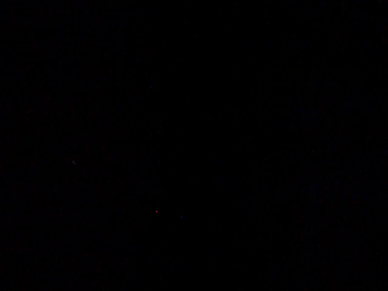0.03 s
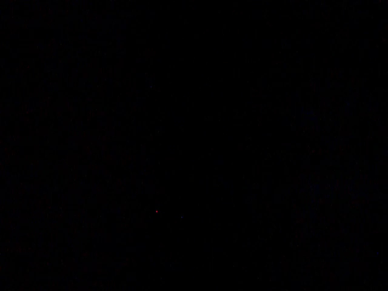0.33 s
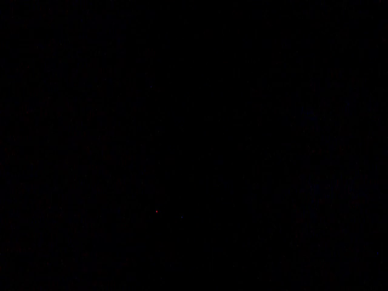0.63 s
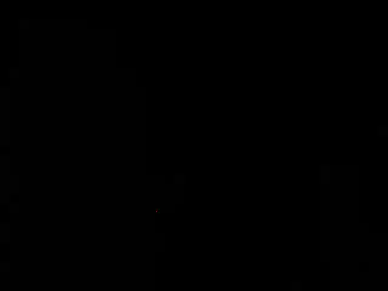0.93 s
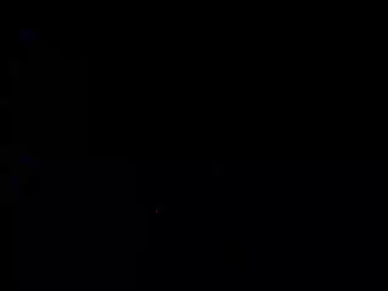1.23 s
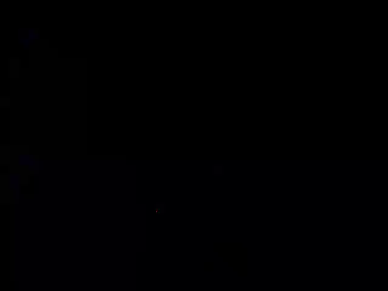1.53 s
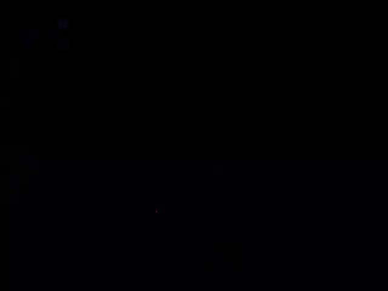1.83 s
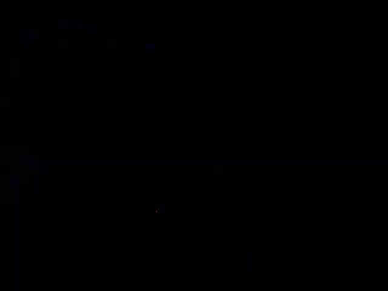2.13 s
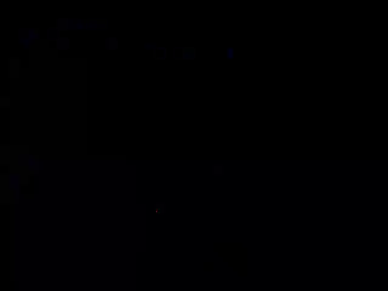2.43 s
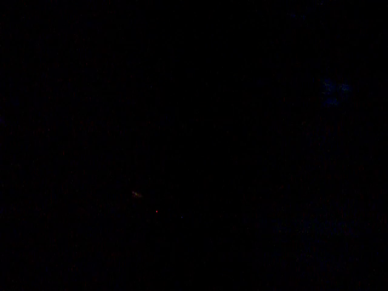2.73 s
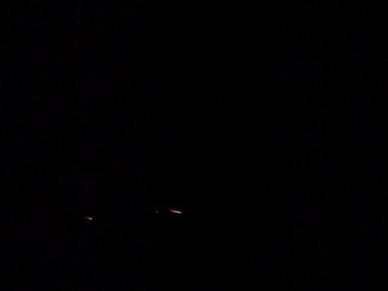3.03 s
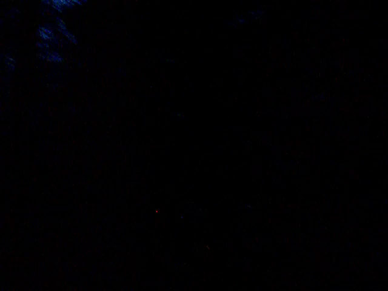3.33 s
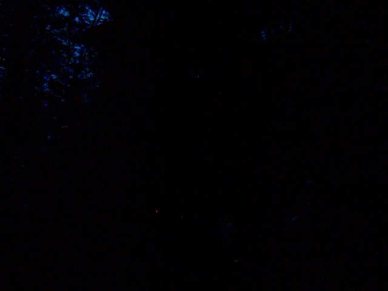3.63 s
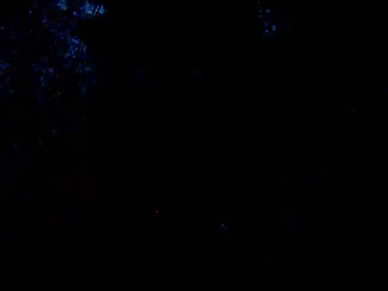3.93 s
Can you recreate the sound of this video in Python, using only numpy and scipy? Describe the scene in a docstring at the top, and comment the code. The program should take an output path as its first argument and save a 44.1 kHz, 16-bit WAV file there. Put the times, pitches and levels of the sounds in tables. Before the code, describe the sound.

A shrill chorus of small peeping frogs runs steadily for all four seconds, blurred by trees, with nearer single peeps standing out. A close bird gives short, sharp, upswept chirps at uneven intervals, clearest around 0.3, 1.1 and 2.1 seconds and loudest at 3.1. Dry leaves rustle faintly, with small snaps near 0.9 and 3 seconds. A low distant rumble and soft hiss lie underneath.

```python
"""A pond after dusk, in mono. A crowd of small frogs gives short, throbbing, rising peeps that the trees
smear into one shrill band, and nearer frogs call over it. A bird close by gives sharp upswept chips,
blurred by twigs. Dry leaves crackle and snap now and then. Under it all lies a bed of night air:
a low far rumble, soft hiss and a faint hum."""
import sys
import numpy as np
from scipy import signal
from scipy.fft import rfft, irfft
from scipy.io import wavfile

SR = 44100
rng = np.random.default_rng(int(sys.argv[2]) if len(sys.argv) > 2 else 0)


def generate_wav(signal):
    """Clip the signal to [-1, 1] and save it as 16-bit WAV at the path in sys.argv[1]."""
    frames = np.transpose(np.atleast_2d(signal))
    scaled = np.clip(frames, -1, 1) * 32767
    pcm = np.round(scaled).astype(np.int16)
    wavfile.write(sys.argv[1], SR, pcm)


N = 176400
T = np.arange(N) / SR

# mid-call pitch of the lowest, middle and highest frog in the chorus: f/Hz
CHORUS_PITCHES = [2878, 3119, 3485]
# fader ride on the chorus, taken about its mean and scaled by SWELL_DEPTH: t/s, level/dB
CHORUS_RIDE = [(0.0, -29.5), (0.24, -27.5), (0.47, -33.5), (0.71, -29.5), (0.94, -34), (1.18, -30),
               (1.41, -33.5), (1.65, -36), (1.88, -30), (2.12, -35), (2.35, -33), (2.59, -31.0),
               (2.82, -30.5), (3.06, -30.9), (3.29, -32), (3.53, -29), (3.76, -29), (4.0, -30.5)]
FROG_COUNT, BANK_COUNT, CALL_EVERY_S = 96, 8, .5
CHORUS_DB, SWELL_DEPTH, EDGE_LOSS_DB = -34.5, .45, 4   # the lowest and highest frogs are fainter
PEEP_RISE_HZ, PEEP_WAVER_HZ, THROB_RANGE_HZ, THROB_DEPTH = 237.3, 18, (53.9, 141.4), .38

# EQ curve of the far rumble: f/Hz, relative level/dB
RUMBLE_EQ = [(12, -32.5), (20, 4.5), (54, -2.5), (103, 0.5), (121, -2), (151, -11.5), (188, -6.5),
             (250, -15), (288, -13.5), (406, -18.5), (686, -16.5), (874, -18.5), (948, -19.5), (1160, -22),
             (2500, -31), (3250, -61), (5500, -120)]
# EQ curve of the hiss: f/Hz, relative level/dB
HISS_EQ = [(1800, -19.5), (2600, -6.5), (3900, -1), (4300, 0.5), (4700, 6.5), (5700, -5.5), (6300, -1.5),
           (7500, -5.5), (8000, -16), (8600, -22.5)]
# partials of the hum: f/Hz, level/dB
HUM_PARTIALS = [(705, -72), (957, -66.5), (1912, -90.5)]
RUMBLE_DB, HISS_DB, HUM_WAVER = -45.5, -59, .003

# cues for the nearer frogs: t/s, length/s, mid-call f/Hz, level/dB
PEEP_CUES = [(.04, 0.17, 3490, -47.5), (0.19, 0.051, 3123, -32.5), (0.548, .12, 2870, -46),
             (0.622, 0.059, 3080, -32), (0.619, 0.11, 3560, -47), (0.769, .035, 3110, -31),
             (0.807, .13, 3490, -46.5), (1.255, 0.014, 3170, -28.5), (1.412, 0.087, 3550, -44),
             (1.599, 0.13, 3390, -43.5), (1.73, 0.049, 3464, -41), (1.707, 0.023, 3070, -45.5),
             (1.878, 0.016, 3047, -31.5), (1.989, .11, 3560, -43.5), (2.02, 0.077, 2874, -41),
             (2.326, 0.077, 3383, -38.5), (2.462, 0.067, 3540, -42.5), (2.491, .08, 3020, -33.5),
             (2.64, 0.082, 3610, -47), (2.886, 0.026, 3086, -30), (2.937, 0.12, 3475, -46),
             (3.18, 0.13, 2913, -43), (3.481, .08, 3580, -43), (3.523, 0.11, 3160, -35),
             (3.72, 0.074, 3490, -42), (3.881, 0.067, 3153, -37)]

# cues for the bird: t/s, upsweep stretch/ratio, top f/Hz, level/dB, wet/share (capped at 1)
CHIP_CUES = [(0.254, 1.1, 5540, -48, 0.9), (.292, 2.05, 5374, -37.5, 0.98), (.345, 1, 5470, -43.5, 0.3),
             (0.869, 1.1, 5446, -42, 0.94), (1.143, 1.7, 5560, -34.5, 0.92),
             (1.573, 0.96, 5505, -43.5, 0.72), (2.105, 2, 5550, -35.5, 0.5), (2.246, 2, 5480, -46, 0.65),
             (2.285, 1.1, 5385, -44, 1.1), (2.831, 2.1, 5405, -42, .8), (3.131, 1.08, 5593, -28, 0.42),
             (3.513, 2.3, 5560, -43, 0.65), (3.72, 1.67, 5570, -41.5, 0.5)]
BASE_SWEEP_S, HOLD_S, FALL_S = .0092, .016, .031
SWEEP_FROM_HZ, SAG_HZ, SWEEP_DB, SAG_DB = 3700, 517, -7.5, -5.5
SWEEP_RASP_HZ, HOLD_RASP_HZ, SAG_RASP_HZ = 480, 60, 220
TWIG_T60_S, TAIL_DB, TAIL_T60_S = .083, -14.5, .66   # the loudest chip's echoes: twigs, then trees
FAR_TAIL_SHARE, FAR_BLUR_PER_DB = .26, .25   # fainter chips are farther off: more tail, longer blur

# cues for snaps among the leaves: t/s, level/dB
SNAP_CUES = [(0.372, -49), (.725, -43.5), (0.802, -44), (0.855, -34), (0.956, -39), (1.29, -45),
             (1.935, -41), (2.12, -39), (2.348, -48), (2.445, -45), (2.55, -42), (2.991, -33.5),
             (3.266, -44), (3.818, -41.5), (3.859, -50)]
# cues for rustles: t/s, attack/s, decay time constant/s, level/dB
RUSTLE_CUES = [(.70, 0.14, 0.28, -54), (1.089, 0.073, 0.063, -51), (1.883, .025, 0.19, -51),
               (2.07, 0.017, 0.31, -55.5), (2.823, .02, 0.1, -47), (2.985, .01, 0.15, -51.5),
               (3.72, 0.12, 0.14, -57)]
# EQ curve of rustles and snaps: f/Hz, relative level/dB
LEAF_EQ = [(1200, -10), (2500, -7), (4000, -1.5), (5500, -2), (6800, 2.5), (7500, 1.5), (8000, -11.5),
           (8600, -16)]
CRACKLES_PER_S, CRACKLE_SPREAD_DB, SNAP_DECAY_S = 900, 4, .0011


def from_db(db):
    """Decibels to gain."""
    return 10 ** (np.asarray(db) / 20)


def rms_one(x):
    """Scale to rms 1."""
    return x / np.sqrt(np.mean(x ** 2) + 1e-20)


def add(out, start_s, sound):
    """Mix a sound in at its cue."""
    i = int(round(start_s * SR))
    a, b = max(i, 0), min(i + len(sound), len(out))
    if b > a:
        out[a:b] += sound[a - i:b - i]


def equalise(x, curve):
    """Apply an EQ curve (f/Hz, level/dB), keeping the power of white noise."""
    hz, db = np.transpose(curve)
    f = np.maximum(np.arange(len(x) // 2 + 1) * SR / len(x), 1)
    gain = from_db(np.interp(np.log(f), np.log(hz), db))
    return irfft(rfft(x) * rms_one(gain), len(x))


def drift(t, rate, size=512):
    """Random modulator of spread about 1, gliding to a new value rate times a second."""
    return np.interp(t * rate, np.arange(size), rng.standard_normal(size))


def scatter(t60):
    """Reverb impulse of countless small echoes, of unit energy."""
    t = T[:SR]
    echoes = rng.standard_normal(SR) * from_db(-60 * t / t60) * (1 - np.exp(-t / .0017))
    return echoes / np.sqrt(np.sum(echoes ** 2))


def outdoors(x, wet, t60):
    """Equal-power blend of a sound with its echoes from bushes and trees."""
    wet = np.clip(wet, 0, 1)
    impulse = np.sqrt(wet) * scatter(t60)
    impulse[0] += np.sqrt(1 - wet)
    return signal.fftconvolve(x, impulse)


def peep(hz, length_s):
    """One frog call: a throbbing whistle that rises in pitch as it swells and fades."""
    t = T[:9000]
    progress = np.clip(t / length_s, 0, 1)
    pitch = hz + PEEP_RISE_HZ * (progress - .5) + PEEP_WAVER_HZ * drift(t, 115.7)
    throb = 1 + THROB_DEPTH * np.sin(2 * np.pi * (rng.uniform(*THROB_RANGE_HZ) * t + rng.random()))
    envelope = np.sqrt(2) * np.sin(np.pi * progress) * throb
    return envelope * np.sin(2 * np.pi * np.cumsum(pitch) / SR)


def frog_chorus():
    """Far frogs on several banks repeat their own pitches out of turn; the trees smear them together."""
    banks = np.zeros((BANK_COUNT, N + SR))   # one second of pre-roll
    ranks = np.arcsin(np.linspace(-1, 1, FROG_COUNT)) * 2 / np.pi   # bunched around the middle pitch
    for i, hz in enumerate(np.interp(ranks, [-1, 0, 1], CHORUS_PITCHES)):
        gain = from_db(rng.uniform(-4.5, 2.5) - EDGE_LOSS_DB * ranks[i] ** 2)
        period_s = CALL_EVERY_S * rng.uniform(.99, 1.01)
        stagger = i * (np.sqrt(5) - 1) / 2 % 1   # golden-ratio steps keep neighbours apart
        for k in range(14):
            start_s = period_s * (k + stagger + rng.normal(0, .04))
            add(banks[i % BANK_COUNT], start_s, gain * peep(hz, length_s=rng.uniform(.0884, .1321)))
    crowd = sum(outdoors(bank, wet=.44, t60=.79)[SR:SR + N] for bank in banks)
    ride_db = np.interp(T, *np.transpose(CHORUS_RIDE))
    return rms_one(crowd) * from_db(CHORUS_DB + SWELL_DEPTH * (ride_db - ride_db.mean()))


def night_air():
    """The bed: far rumble, soft hiss and a thin wavering hum."""
    rumble = from_db(RUMBLE_DB) * equalise(rng.standard_normal(N), RUMBLE_EQ)
    hiss = from_db(HISS_DB) * equalise(rng.standard_normal(N), HISS_EQ)
    wavering_t = np.cumsum(1 + HUM_WAVER * drift(T, 12)) / SR
    hum = sum(np.sqrt(2) * from_db(db) * np.sin(2 * np.pi * hz * wavering_t) for hz, db in HUM_PARTIALS)
    return rumble + hiss + hum


def near_frogs():
    """Single peeps in front of the chorus, with a shorter reverb."""
    out = np.zeros(N)
    for start_s, length_s, hz, db in PEEP_CUES:
        add(out, start_s, from_db(db) * outdoors(peep(hz, length_s), wet=.5, t60=.54))
    return out


def bird_chips():
    """Each chip rasps up to a clear held note and sags, blurred by twigs and trailing off in the trees."""
    out, t = np.zeros(N), T[:6000]
    loudest_db = max(cue[3] for cue in CHIP_CUES)
    for start_s, stretch, top_hz, db, wet in CHIP_CUES:
        sweep_s, far_db = BASE_SWEEP_S * stretch, loudest_db - db
        knees = np.cumsum([0, sweep_s / 4, sweep_s / 2, sweep_s / 4, HOLD_S, FALL_S / 2, FALL_S / 2])
        pitch = np.interp(t, knees[[0, 3, 4, 5]], [SWEEP_FROM_HZ, top_hz, top_hz, top_hz - SAG_HZ])
        rasp_hz = np.interp(t, knees[2:6], [SWEEP_RASP_HZ, HOLD_RASP_HZ, HOLD_RASP_HZ, SAG_RASP_HZ])
        pitch += rasp_hz * drift(t, 2500)
        envelope = np.interp(t, knees, [0, from_db(SWEEP_DB), from_db(SWEEP_DB), .7, 1, from_db(SAG_DB), 0])
        chip = from_db(db) * np.sqrt(2) * envelope * np.sin(2 * np.pi * np.cumsum(pitch) / SR)
        add(out, start_s, outdoors(chip, wet, TWIG_T60_S * (1 + FAR_BLUR_PER_DB * far_db)))
        tail = signal.fftconvolve(chip, scatter(TAIL_T60_S))
        add(out, start_s, from_db(TAIL_DB + FAR_TAIL_SHARE * far_db) * tail)
    return out


def dry_leaves():
    """Swells of fine dry crackle, with short noise bursts for the sharper snaps."""
    clicks = (rng.random(N) < CRACKLES_PER_S / SR) * rng.choice([-1, 1], N)
    clicks = clicks * from_db(CRACKLE_SPREAD_DB * np.minimum(rng.exponential(1, N), 4))
    crackle = rms_one(rms_one(clicks) + .6 * rng.standard_normal(N))   # noise softens the grain
    power = np.zeros(N)
    for start_s, attack_s, decay_s, db in RUSTLE_CUES:
        attack = np.clip((T - start_s) / attack_s, 0, 1)
        decay = np.exp(-np.maximum(T - start_s - attack_s, 0) / decay_s)
        power += (from_db(db) * attack * decay) ** 2
    out, t = crackle * np.sqrt(power), T[:SR // 50]
    for start_s, db in SNAP_CUES:
        add(out, start_s, from_db(db) * np.exp(-t / SNAP_DECAY_S) * rng.standard_normal(len(t)))
    return equalise(out, LEAF_EQ)


def bird_tick(start_s=2.527, length_s=.024, hz=6300, db=-54.5):
    """One fainter, higher bird note, raspy and blurred by twigs."""
    out, t = np.zeros(N), T[:6000]
    envelope = np.sin(np.pi * np.minimum(t / length_s, 1))
    pitch = hz + SAG_RASP_HZ * drift(t, 2500)
    tick = envelope * np.sin(2 * np.pi * np.cumsum(pitch) / SR)
    add(out, start_s, from_db(db) * outdoors(tick, wet=.5, t60=TWIG_T60_S))
    return out


def scene():
    """Frogs, bird, leaves and air, all panned dead centre."""
    mix = frog_chorus() + near_frogs() + bird_chips() + bird_tick() + dry_leaves() + night_air()
    return np.tile(mix, (2, 1))


def record(dry):
    """A steep low-pass on the master takes off the top."""
    low_pass = signal.ellip(10, .2, 70, 8700, fs=SR, output="sos")   # corner at 8700 Hz
    return signal.sosfilt(low_pass, dry)


dry = scene()
out = record(dry)
generate_wav(out)
```